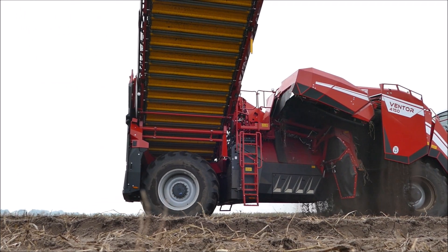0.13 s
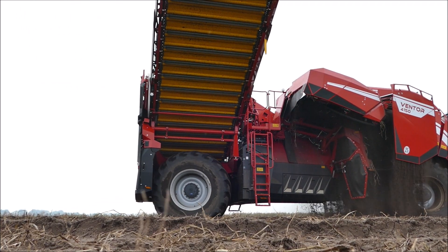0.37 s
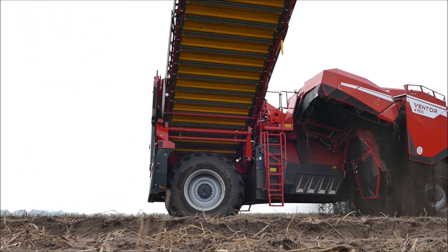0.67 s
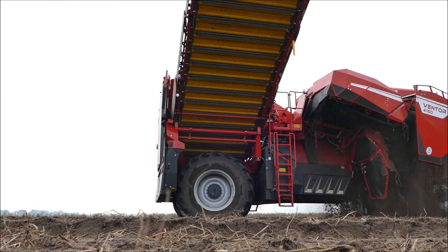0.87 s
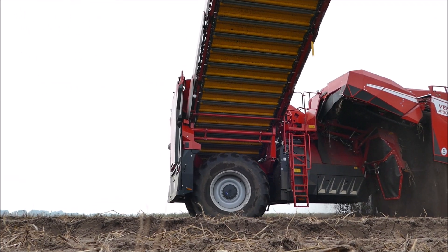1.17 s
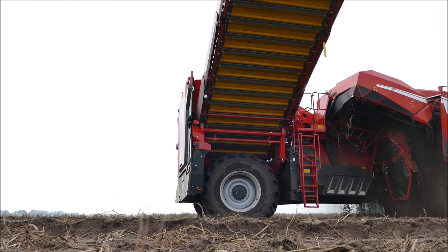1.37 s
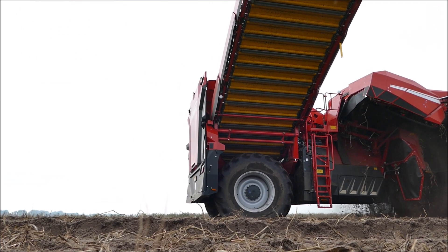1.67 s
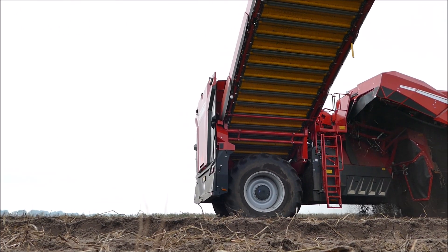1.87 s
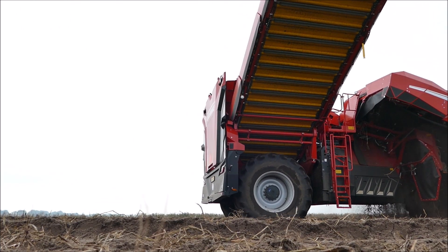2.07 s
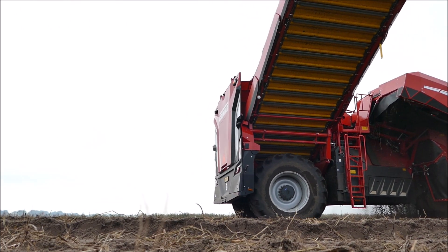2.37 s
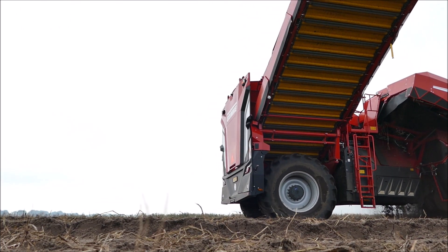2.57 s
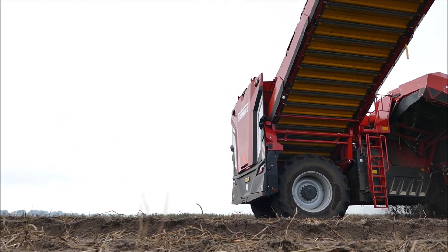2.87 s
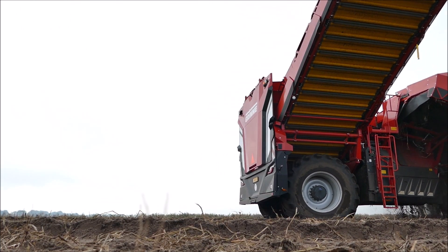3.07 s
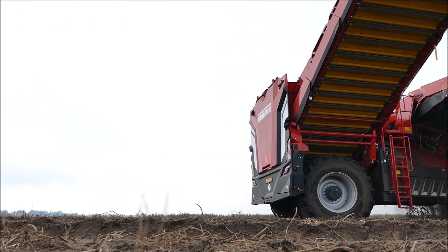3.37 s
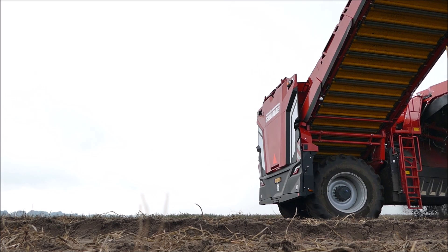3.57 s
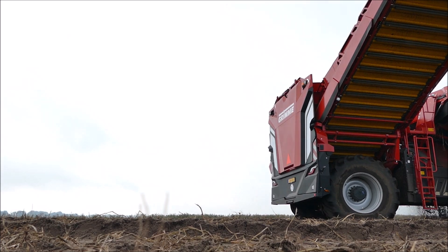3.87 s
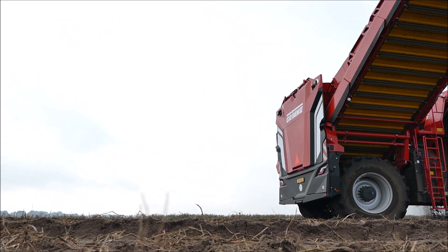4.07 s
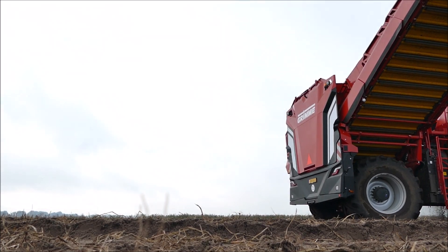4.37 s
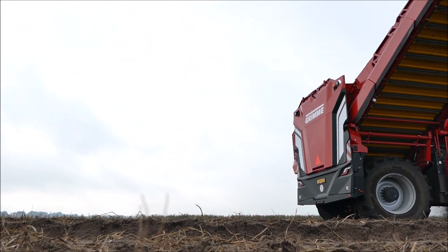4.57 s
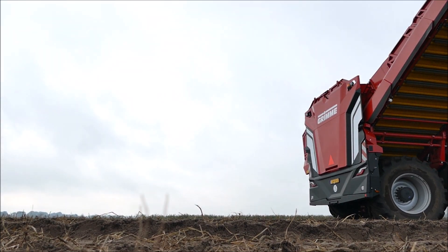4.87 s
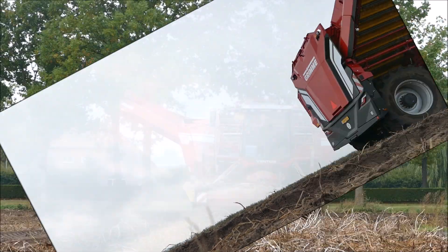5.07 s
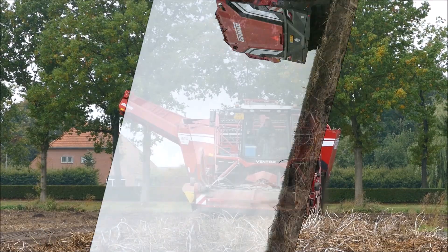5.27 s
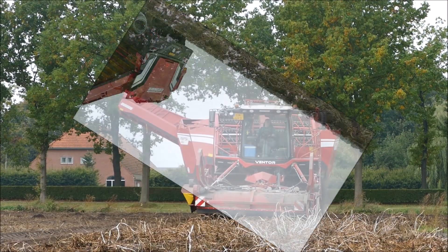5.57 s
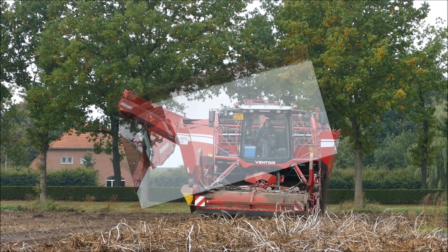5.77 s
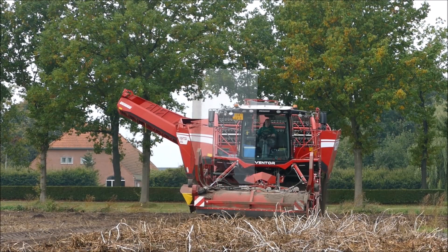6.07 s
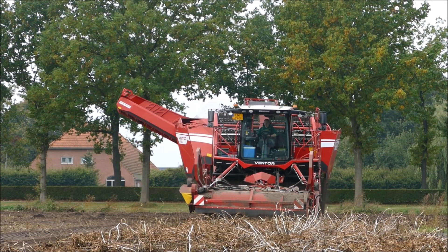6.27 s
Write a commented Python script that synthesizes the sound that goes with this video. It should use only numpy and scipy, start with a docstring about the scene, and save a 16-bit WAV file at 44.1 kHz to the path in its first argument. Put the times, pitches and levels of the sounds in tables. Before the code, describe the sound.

A large potato harvester drums and clatters past in an open field, chains rattling over a low diesel rumble, then steadily fades away.

```python
"""Drumming panels and clattering chains are heard first: a potato harvester passes in a field and fades.
Tubers and clods excite panel resonances; rods and links ring under random contacts in the sieve webs.
Diesel orders, shafts, two beating pumps, gears and a turbocharger add fluttering tones.
Sifted soil is dense filtered noise; stones clink, flints tick and low thuds surge at listed times.
A faint field wash remains, and a low drone swells at the end."""
import sys
import numpy as np
from scipy import signal
from scipy.fft import rfft, irfft
from scipy.io import wavfile
from scipy.ndimage import uniform_filter1d

SR = 44100
rng = np.random.default_rng(int(sys.argv[2]) if len(sys.argv) > 2 else 0)


def transcribe(signal):
    """Save signal, clipped to [-1, 1], as a 16-bit WAV file at the path in sys.argv[1]."""
    frames = np.atleast_2d(signal).T
    limited = np.clip(frames, -1, 1)
    pcm = np.round(limited * 32767).astype(np.int16)
    wavfile.write(sys.argv[1], SR, pcm)


N = 283122
T = np.arange(N) / SR
HZ = np.maximum(np.arange(N // 2 + 1) * SR / N, 1)

# steady background of the open field, relative spectrum: frequency_hz, level_db
FIELD_SPECTRUM = [(30, -18), (120, -14), (300, -6), (500, 5.5), (700, 1.5), (900, -0.5), (1170, 2),
                  (1600, -1), (2200, -6), (4000, -10.5), (9000, -27), (14000, -52)]
# low drone swelling at the end: time_s, pitch_hz, level_db
DRONE_CURVE = [(0, 193, -100), (6.1, 196, -87), (6.25, 192.4, -59), (6.36, 209, -48), (6.42, 205, -44)]

# fading level shared by chains, whines, soil, dust and turbo whistle: time_s, level_db
PASSING_LEVEL = [(0.0, -1), (1.85, -0.5), (2.15, -1.5), (3.1, -3), (3.75, -6), (4.15, -6), (4.8, -9.5),
                 (5.2, -11), (5.75, -16), (6.42, -19.5)]
# reference levels (dB) to which the shared fading level, times each share, is added
CHAIN_DB, SOIL_DB, DUST_DB = -31.5, -36.5, -40
CHAIN_FADES, SOIL_FADES, DUST_FADES = 1.205, 1.13, 0.95

# diesel rumble, heard best from the side and again once the tail comes round: time_s, level_db
ENGINE_LEVEL = [(0, -31.3), (0.9, -31.5), (1.6, -32), (2.4, -33.5), (2.9, -36.5), (3.6, -38), (4.1, -39.5),
                (4.7, -39), (5.0, -44.5), (5.2, -44.5), (5.6, -46.5), (6.42, -53.5)]
# diesel orders: pitch_hz, level_db (relative to the rumble)
ENGINE_ORDERS = [(85.2, -25), (113.4, -12), (125, -16), (146, -16), (170, -15)]
# diesel rumble, relative spectrum: frequency_hz, level_db
RUMBLE_SPECTRUM = [(20, -43), (55, -29), (75, -16), (90, -9.5), (115, -3), (170, 4), (195, 5.5), (230, -53),
                   (300, -43)]
# random throb of the low sounds: rms depth (dB) and turns per second
ENGINE_THROB_DB, ENGINE_THROBS_PER_S = 1.5, 7.8
DRUM_THROB_DB, DRUM_THROBS_PER_S = 0.98, 2.8

# turbocharger whistle: time_s, pitch_hz, level_db (relative to the dust before its showers and spills)
TURBO_CURVE = [(0, 9110, -16), (0.35, 9100, -14), (0.65, 9055, -14), (1.15, 9040, -14.5), (1.8, 9048, -13),
               (2.1, 9025, -15), (2.6, 9050, -18), (3.1, 9090, -21), (3.7, 9105, -18), (4.25, 9098, -13),
               (4.6, 9065, -21), (4.95, 9015, -14), (5.3, 9038, -12), (5.8, 9040, -17), (6.42, 9042, -20)]
# pump and gear whines: pitch_hz (at mean pump speed), near_db, far_db (both relative to the clatter),
# facing_s (beam points this way), half_length_s, swell_db, wander_hz (rms)
WHINE_LINES = [(855, -17.5, -13, 1.2, 0.6, 5, 8), (900, -16, -18, 1.0, .8, 4.5, 18),
               (1140, -26, -21.5, 3.2, 1.2, 4, 3), (1425, -19.5, -18, 1.2, 1.0, 9, 3),
               (1710, -22, -17, 1.8, .4, 5, 4), (1995, -12.5, -11, 1.6, 0.55, 2.5, 2),
               (2280, -18.5, -19, 3.1, 1.3, 4.5, 3), (2910, -26, -11.5, 2.95, .45, 6.5, 7),
               (3138, -26, -23, 1.45, 0.35, 10.5, 4)]

# falling soil, relative spectrum: frequency_hz, level_db
SOIL_SPECTRUM = [(2000, -34), (2700, -0.5), (3100, 2.5), (3700, -0.5), (4700, -1), (6500, -3.5),
                 (8000, -6.5), (9000, -6.5), (11000, -48)]
# fine dust and grit, relative spectrum: frequency_hz, level_db
DUST_SPECTRUM = [(6500, -6.5), (8200, -12), (9100, 2.5), (10200, 1), (11300, -2), (12400, -3), (13600, -6),
                 (15200, -24)]
# loads of earth spilling through the webs: peak_s, rise_s, fall_s, chain_swell_db, soil_swell_db
EARTH_SPILLS = [(0.05, 0.017, 0.082, 0, 2.5), (0.225, 0.017, .07, 1.5, 2), (0.39, .03, 0.0092, 5, 4),
                (0.74, .04, 0.032, 2.5, 2), (0.805, .008, 0.01, 4.5, 2.5), (1.71, 0.027, 0.021, 0.5, 3),
                (1.84, .04, 0.052, 2, 1), (1.945, 0.025, 0.032, -1.5, 2.5), (2.32, .008, .02, 0.8, 2.5),
                (3.028, 0.048, 0.034, 3.2, 0.7), (3.52, 0.014, 0.025, 3, 1.5), (4.04, .015, .05, -0.5, 2),
                (4.21, .02, .04, 1.5, -1), (5.166, 0.09, .07, 0.5, 2.3), (5.52, .06, 0.079, 2.5, 2),
                (6.352, 0.054, 0.055, 3.5, 3.5)]
AIR_LOSS_DB_PER_S = 1.5  # growing loss of the very top

# chain clatter, relative spectrum: frequency_hz, level_db
CLATTER_SPECTRUM = [(400, -27), (600, -6), (780, -2), (1000, -6), (1215, -6.5), (1500, -1.5), (1900, -2.5),
                    (2150, -8), (2550, -7.5), (2900, -8), (3600, -41)]
# rod resonances, shifting as the webs tighten and slacken: pitch_hz, width_hz, level_db,
# pitch_wander (rms share of the pitch)
ROD_MODES = [(880, 54, 0, .04), (1100, 140, -14, .02), (1434, 170, -4.5, .03), (1740, 130, -14.5, .02),
             (2010, 110, -11, .01), (2330, 78, -4.5, .015), (2465, 135, -8, .015), (2872, 69, -8.5, .005)]
# loose links: pitch range (Hz), width of each ring (Hz), knocks per second on each link
LINK_RANGE_HZ, LINK_WIDTH_HZ, LINK_KNOCKS_PER_S = (760, 2500), 10, 5
LINK_DB = -7.5  # relative to the clatter

# stones clinking on the steel rods: start_s, level_db
STONE_CLINKS = [(0.052, -26), (1.592, -23.5), (2.062, -25.5), (3.522, -29.5), (3.548, -30.5), (4.547, -36),
                (5.326, -37.5), (5.712, -41.5)]
# flints ticking on the frame: start_s, level_db
FLINT_TICKS = [(0.055, -31), (0.222, -33), (0.570, -28.5), (0.806, -30), (0.896, -34), (1.917, -31.5),
               (1.939, -29.5), (3.542, -39), (5.148, -42), (5.663, -46), (6.278, -50)]
# low thuds and surges of the drumming, some with a gritty clack:
# start_s, thud_db, clack_db (before the common trim in low_thuds)
LOW_THUDS = [(0.048, -11, -28), (0.103, -26, -23), (0.378, -22, -25), (0.570, -26, -25), (0.606, -17, -38),
             (0.805, -25, -26), (1.133, -15, -38), (1.271, -17, -34), (1.362, -16, -38), (1.501, -14, -38),
             (1.918, -26, -26), (2.070, -15, -38), (2.331, -15, -24), (3.116, -17, -38), (3.271, -28, -27),
             (3.520, -18, -30), (3.851, -20, -36), (4.093, -18, -31), (4.570, -24, -42), (4.869, -21, -38),
             (5.150, -36, -40), (5.200, -32, -37), (5.345, -29, -46), (5.513, -34, -38), (5.895, -33, -50),
             (5.912, -42, -40)]

# pump speed, sagging and recovering: time_s, piston_rate_hz (before a slight random waver)
PUMP_SPEED_CURVE = [(0, 285), (0.33, 287.2), (0.6, 285), (0.79, 286.5), (0.93, 284.3), (1.5, 284.8),
                    (1.85, 287.2), (1.98, 283.7), (2.76, 283.5), (3.0, 285.2), (3.2, 285.2), (3.38, 287.4),
                    (3.6, 285.3), (4.35, 286.8), (4.52, 285.3), (4.76, 287), (5.0, 284.1), (6.42, 284.3)]
# pump hum, swelling and sinking: time_s, level_db (relative to the drumming)
PUMP_HUM_LEVEL = [(0, -3), (0.25, -5), (0.45, -14), (0.75, -2.5), (1.5, -1.5), (1.8, -6), (2.05, -.5),
                  (2.45, -1), (2.8, -5.5), (3.1, -.5), (3.6, -2), (4.4, -1.5), (5.1, -5), (6.42, -7)]
PUMP_WAVER_RAD = .4  # rms phase lead or lag of the hum
# second pump: level against the first (dB), time between beats (s), a moment when both are in step (s)
SECOND_PUMP_DB, BEAT_S, BEAT_AT_S = -8.5, 0.46, 2.1

# drive shafts: pitch_hz (at mean pump speed), near_db, far_db (both relative to the drumming)
SHAFT_TONES = [(212.5, -18, -16), (221.5, -10, -13), (251.5, -13, -7.5), (375.5, -13, -9.5),
               (381, -19, -15), (444, -26, -25), (531, -34, -31)]
# panel resonances: pitch_hz, width_hz, level_db
PANEL_MODES = [(210, 52, -10.5), (250.7, 27, 2), (309.5, 41, -1), (376.4, 28, -9)]
# panel boom, relative spectrum: frequency_hz, level_db
BOOM_SPECTRUM = [(140, -69), (180, -15), (205, -3), (250, 0), (320, -2), (375, -4), (400, -9.5), (500, -17),
                 (620, -27), (900, -51)]
# drumming on the panels: time_s, level_db (before the lulls and the throb)
DRUMMING_LEVEL = [(0, -26.5), (0.7, -25), (1.3, -24.5), (2.2, -26.5), (3.0, -27.5), (3.6, -27), (4.3, -31),
                  (5.2, -34.8), (5.7, -40), (6.2, -47.5), (6.42, -49.5)]
# brief drops of the drumming: centre_s, half_length_s, change_db
DRUMMING_LULLS = [(2.224, 0.01, -12), (4.08, 0.018, -4), (4.178, 0.0079, -14), (5.304, 0.036, -9),
                  (5.946, .015, -5)]

# left-right likeness of diffuse sounds: frequency_hz, likeness (0 to 1)
STEREO_LIKENESS = [(25, 0.53), (70, 0.85), (150, 1), (350, 0.99), (520, 0.77), (700, 0.67), (900, 0.69),
                   (1150, 0.56), (1600, 0.81), (2400, 0.68), (4500, 0.61), (7000, 0.62), (9500, 0.61),
                   (13000, 0.13)]
# stereo balance: frequency_hz, left_minus_right_db
STEREO_BALANCE = [(100, 0), (300, 0), (540, 0), (730, -3.5), (880, -0.5), (1170, -10), (1450, -4.5),
                  (2000, -5), (2300, -6), (2900, -6), (4500, -4.5), (9000, -3), (14000, -1.2)]
# narrow hollows in the overall colour: centre_hz, width_hz, near_db, far_db (both left at the bottom)
SPECTRAL_HOLLOWS = [(576, 81, -2, -16), (2690, 140, -19, -19)]
CUTOFF_HZ = 15250


def from_db(db):
    """Decibel law: amplitude gain is ten to the power of level over twenty."""
    return 10 ** (np.asarray(db) / 20)


def rms_one(x):
    """Normalisation: a signal divided by its rms has unit mean power."""
    return x / np.sqrt(np.mean(np.abs(x) ** 2) + 1e-20)


def in_time(rows):
    """Linear interpolation: one curve in time per column after the first."""
    s, *columns = np.transpose(rows)
    return [np.interp(T, s, c) for c in columns]


def at_hz(points):
    """Logarithmic frequency scale: a table is interpolated along log frequency."""
    hz, value = np.transpose(points)
    return np.interp(np.log(HZ), np.log(hz), value)


def colour(x, spectrum):
    """Spectral shaping: each frequency is scaled by the spectrum, then the rms is set to 1."""
    return rms_one(irfft(rfft(x) * from_db(at_hz(spectrum)), N))


def white_pair():
    """White noise: two independent signals with equal power at all frequencies."""
    return rng.standard_normal((2, N))


def drift(rate):
    """Low-pass random motion: slow chance with about `rate` turns a second and unit spread."""
    step = 40   # samples between the slow values
    r = np.exp(-2 * np.pi * rate * step / SR)
    noise = rng.standard_normal(N // step + 2002)
    slow = signal.lfilter([1], [1, -2 * r, r * r], noise)[2000:]   # the filter has settled
    return np.interp(np.arange(N) / step, np.arange(len(slow)), rms_one(slow))


def swell(at_s, rise_s, fall_s):
    """Gaussian envelope: a bell of height 1 with separate rise and fall times."""
    return np.exp(-((T - at_s) / np.where(T < at_s, rise_s, fall_s)) ** 2)


def resonate(x, modes):
    """Modal superposition: parallel two-pole resonances of alternating sign."""
    out = 0
    for k, (hz, width, db) in enumerate(modes):
        r = np.exp(-np.pi * width / SR)
        poles = [1, -2 * r * np.cos(2 * np.pi * hz / SR), r * r]
        gain = (-1) ** k * from_db(db) * (1 - r * r) / 2
        out = out + gain * signal.lfilter([1, 0, -1], poles, x + 1e-18)
    return out


def impacts(per_s, spread_db):
    """Random point process: two independent trains of contacts of uneven size and sign."""
    sizes = from_db(spread_db * np.minimum(rng.exponential(1, (2, N)), 4))
    signs = rng.choice([-1, 1], (2, N))
    return rms_one(sizes * signs * (rng.random((2, N)) < per_s / SR))


def bursts(rows, t60):
    """Exponential decay: each hit starts at its level and falls 60 dB in t60 seconds."""
    hits = np.zeros(N)
    for s, db in rows:
        hits[int(s * SR)] += from_db(db)
    return signal.lfilter([1], [1, -from_db(-60 / (t60 * SR))], hits + 1e-18)


def tone(hz, flutter, flutter_rate):
    """Complex modulation: a line of rms 1 flutters in strength and phase."""
    phase = 2 * np.pi * (np.cumsum(hz + np.zeros(N)) / SR + rng.random())
    flutters = 1 + flutter * (drift(flutter_rate) + 1j * drift(flutter_rate))
    return rms_one(np.real(flutters * np.exp(1j * phase)))


def spread(pair):
    """Interaural coherence: two independent signals become left and right with a set likeness."""
    alike = np.clip(at_hz(STEREO_LIKENESS), 0, .999)
    mid, side = rfft(pair) * np.sqrt([(1 + alike) / 2, (1 - alike) / 2])
    return irfft([mid + side, mid - side], N)


def steady(x, seconds):
    """Gain control: division by the running rms evens out slow swells."""
    return x / np.sqrt(uniform_filter1d(np.mean(x ** 2, axis=0), int(seconds * SR)) + 1e-12)


def field():
    """Diffuse background: a soft wash of shaped noise stays constant as the machine recedes."""
    return from_db(-48.5) * spread(colour(white_pair(), FIELD_SPECTRUM))


def drone():
    """Frequency glide: a low fluttering tone dips, then rises as it swells."""
    hz, db = in_time(DRONE_CURVE)
    return from_db(db) * tone(hz, flutter=0.26, flutter_rate=8.0)


def engine(engine_db):
    """Engine orders: hum lines stand out of a throbbing broadband rumble."""
    rumble = spread(colour(white_pair(), RUMBLE_SPECTRUM))
    orders = sum(from_db(db) * tone(hz, flutter=0.18, flutter_rate=0.99) for hz, db in ENGINE_ORDERS)
    throb_db = ENGINE_THROB_DB * drift(ENGINE_THROBS_PER_S)
    return from_db(engine_db + throb_db) * steady(rumble + orders, seconds=0.266)


def turbo(dust_db):
    """Rotor tone: a thin unsteady whistle rises and sags in pitch and level."""
    hz, db = in_time(TURBO_CURVE)
    return from_db(dust_db + db) * tone(hz, flutter=.9, flutter_rate=14)


def piston_rate():
    """Frequency modulation: the pump's rate follows its listed speed curve with a slight random waver."""
    return in_time(PUMP_SPEED_CURVE)[0] * (1 + .0013 * drift(5))


def whines(clatter_db, piston_hz):
    """Directivity: pump and gear tones track pump speed and swell as their beams sweep past."""
    out, speed = 0, piston_hz / piston_hz.mean()
    for hz, near_db, far_db, facing_s, half_s, swell_db, wander_hz in WHINE_LINES:
        beam_db = swell_db * swell(facing_s, half_s, half_s)
        db = clatter_db + np.linspace(near_db, far_db, N) + beam_db
        wandering_hz = hz * speed + wander_hz * drift(5)
        out = out + from_db(db) * tone(wandering_hz, flutter=.55, flutter_rate=7)
    return out


def spills():
    """Additive level swells: spilled earth changes the chain and soil levels, in dB."""
    return sum(np.outer([chain_db, soil_db], swell(s, rise_s, fall_s))
               for s, rise_s, fall_s, chain_db, soil_db in EARTH_SPILLS)


def soil(soil_db, dust_db, shake):
    """Granular noise: crumbs and grit fall through the webs in uneven showers."""
    grains = impacts(per_s=4000, spread_db=3.5) + from_db(6.5) * white_pair()
    grit = impacts(per_s=6500, spread_db=0.5) + from_db(-1.0) * white_pair()
    showers_db = 0.55 * shake + 0.83 * drift(46)
    crumbs = from_db(soil_db + showers_db) * colour(grains, SOIL_SPECTRUM)
    dust_level_db = dust_db + 0.47 * showers_db + 0.66 * drift(18)
    dust = from_db(dust_level_db) * colour(grit, DUST_SPECTRUM)
    # air takes the very top off as the machine moves away
    top = signal.sosfiltfilt(signal.butter(2, 11500, "high", fs=SR, output="sos"), dust)
    return spread(crumbs + dust - top * (1 - from_db(-AIR_LOSS_DB_PER_S * T)))


def links(count=36):
    """Lightly damped resonance: steel links ring when knocked, each at its own pitch."""
    pitches = np.geomspace(*LINK_RANGE_HZ, count) * rng.uniform(.985, 1.015, count)
    out = 0
    for hz in pitches:
        knocks = (rng.random(N) < LINK_KNOCKS_PER_S / SR) * rng.uniform(.4, 1, N)
        out = out + resonate(knocks, [(hz, LINK_WIDTH_HZ, 0)])
    return colour(out, CLATTER_SPECTRUM)


def rods(contacts):
    """Time-varying resonance: rods ring under contacts, each drifting in pitch on its own; rms 1."""
    out = 0
    for k, (hz, width, db, wander) in enumerate(ROD_MODES):
        # reading the ring faster or slower bends its pitch
        warped = T + wander * np.cumsum(drift(5)) / SR
        ringing = resonate(contacts, [(hz, width, db)])
        bent = np.array([np.interp(warped, T, side, period=N / SR) for side in ringing])
        out = out + (-1) ** k * bent
    return rms_one(out)


def chains(clatter_db, shake):
    """Contact excitation: rods and links rattle densely over a wash of shaped noise."""
    ringing = rods(impacts(per_s=750, spread_db=1.6))
    wash = colour(white_pair(), CLATTER_SPECTRUM)
    clatter = spread(from_db(-6.0) * ringing + from_db(-3.0) * wash)
    level_db = clatter_db + 0.63 * shake + 0.35 * drift(27)
    return from_db(level_db) * (clatter + from_db(LINK_DB) * links())


def stones(clink_t60=0.026, tick_t60=0.012):
    """Brief impact noise: stones clink on the rods and flints tick on the frame."""
    clinks = bursts(STONE_CLINKS, clink_t60) * colour(white_pair(), CLATTER_SPECTRUM)
    ticks = bursts(FLINT_TICKS, tick_t60) * colour(white_pair(), DUST_SPECTRUM)
    return spread(clinks + ticks)


def low_thuds(clack_t60=0.03):
    """Impulse response: the panel resonances boom briefly at each thud, under a short gritty clack."""
    pulses = np.zeros(N)
    for s, thud_db, _ in LOW_THUDS:
        pulses[int(s * SR)] = from_db(thud_db)
    # divide by the peak of one unit pulse, so each thud peaks at its listed level
    panel_peak = np.abs(resonate(signal.unit_impulse(SR // 10), PANEL_MODES)).max()
    booms = resonate(pulses, PANEL_MODES) / panel_peak
    clacks = bursts([(s, clack_db) for s, _, clack_db in LOW_THUDS], clack_t60)
    grit = spread(colour(white_pair(), SOIL_SPECTRUM))
    return booms + from_db(-5.0) * clacks * grit


def pump(piston_hz):
    """Beating: two pumps at nearly equal speed interfere, and waver as the machine jolts."""
    phase = 2 * np.pi * (np.cumsum(piston_hz) / SR + rng.random()) + PUMP_WAVER_RAD * drift(6)
    beat = 2 * np.pi * (T - BEAT_AT_S) / BEAT_S
    pair = rms_one(np.cos(phase) + from_db(SECOND_PUMP_DB) * np.cos(phase + beat))
    return from_db(in_time(PUMP_HUM_LEVEL)[0]) * pair


def shafts(piston_hz):
    """Rotational tones: shaft lines keep a fixed ratio to the pump speed."""
    speed = piston_hz / piston_hz.mean()
    return sum(from_db(np.linspace(near_db, far_db, N)) * tone(hz * speed, flutter=.25, flutter_rate=2)
               for hz, near_db, far_db in SHAFT_TONES)


def body(piston_hz):
    """Forced panel vibration: tubers and clods drum on booming panels amid pump and shaft hum."""
    lulls_db = sum(db * swell(s, half_s, half_s) for s, half_s, db in DRUMMING_LULLS)
    drum_db = in_time(DRUMMING_LEVEL)[0] + lulls_db
    blows = rms_one(resonate(impacts(per_s=200, spread_db=3.5), PANEL_MODES))
    boom = colour(white_pair(), BOOM_SPECTRUM)
    panels = spread(from_db(-5) * blows + from_db(-1.0) * boom)
    drumming = steady(panels + shafts(piston_hz), seconds=0.09)
    throb_db = DRUM_THROB_DB * drift(DRUM_THROBS_PER_S)
    return from_db(drum_db + throb_db) * (drumming + pump(piston_hz))


def scene():
    """Linear superposition: all machine parts and the field add, the brighter sounds to the right."""
    passing_db, = in_time(PASSING_LEVEL)
    chain_spill_db, soil_spill_db = spills()
    clatter_db = CHAIN_DB + CHAIN_FADES * passing_db
    soil_db = SOIL_DB + SOIL_FADES * passing_db
    dust_db = DUST_DB + DUST_FADES * passing_db
    piston_hz = piston_rate()
    shake = drift(12.0)   # the jolting of the webs moves chains and soil together
    lows = engine(in_time(ENGINE_LEVEL)[0]) + body(piston_hz)
    drives = whines(clatter_db, piston_hz) + turbo(dust_db)
    sieves = chains(clatter_db + chain_spill_db, shake)
    sieves = sieves + soil(soil_db + soil_spill_db, dust_db + soil_spill_db, shake)
    accents = low_thuds() + stones()
    total = lows + drives + sieves + accents + drone() + field()
    lean_db = at_hz(STEREO_BALANCE) / 2
    return irfft(rfft(total) * from_db([lean_db, -lean_db]), N)


def record(dry):
    """Band rejection: of two narrow hollows the lower deepens and the upper stays; the top is cut steeply."""
    for hz, width, near_db, far_db in SPECTRAL_HOLLOWS:
        notched = signal.lfilter(*signal.iirnotch(hz, hz / width, fs=SR), dry)
        dry = notched + from_db(np.linspace(near_db, far_db, N)) * (dry - notched)
    return signal.sosfilt(signal.ellip(12, .1, 80, CUTOFF_HZ, fs=SR, output="sos"), dry)


dry = scene()
out = record(dry)
transcribe(out)
```